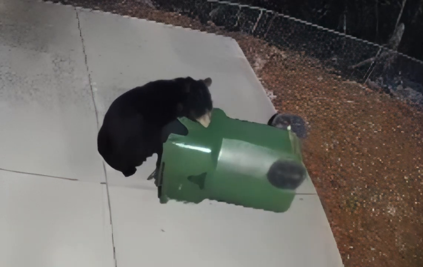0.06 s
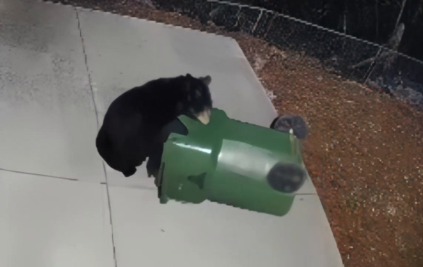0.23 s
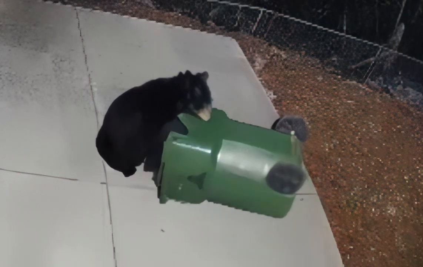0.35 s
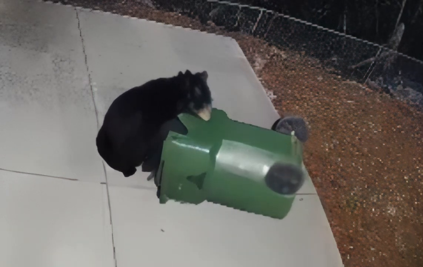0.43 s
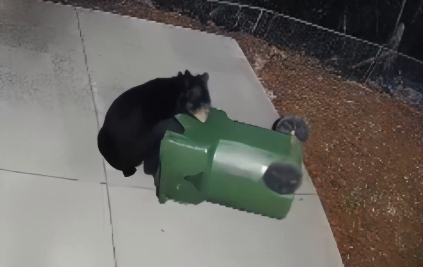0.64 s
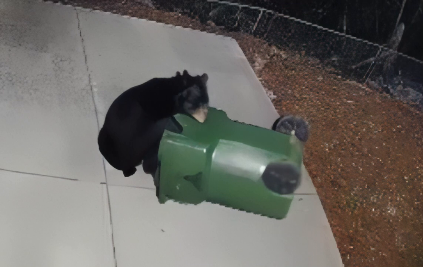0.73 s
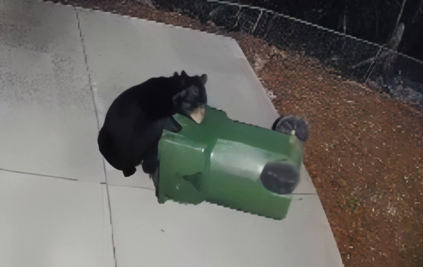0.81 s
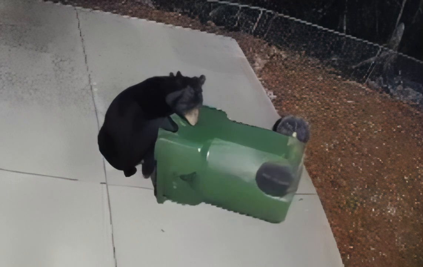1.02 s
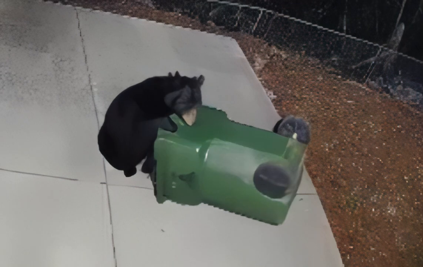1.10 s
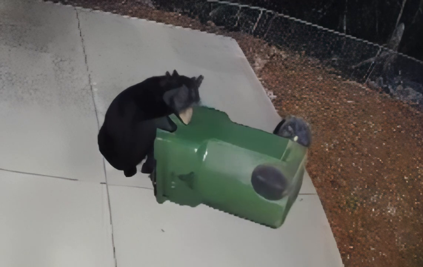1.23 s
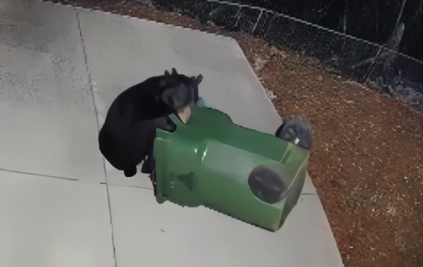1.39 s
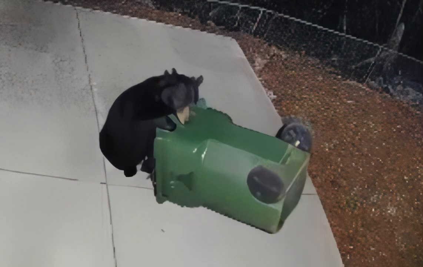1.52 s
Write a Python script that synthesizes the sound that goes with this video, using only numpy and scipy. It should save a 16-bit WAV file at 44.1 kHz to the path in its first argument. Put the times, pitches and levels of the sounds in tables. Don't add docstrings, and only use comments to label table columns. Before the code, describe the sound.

A plastic wheelie bin scrapes on concrete outdoors. After near-silent hush and faint creeping, claws scratch and knock it sharply from 0.2 to 0.35 seconds, with a hard gritty drag and ticks until about 0.55. Lighter knocks follow; a latch rings faintly at 0.84. Around 1.12-1.2 hollow, booming thuds tumble together, then small rattles fade to quiet, with a soft knock near 1.5. Muffled, squashed camera sound.

```python
import sys
import numpy as np
from scipy import signal
from scipy.fft import rfft, irfft
from scipy.io import wavfile
from scipy.ndimage import uniform_filter1d

SR = 44100
rng = np.random.default_rng(int(sys.argv[2]) if len(sys.argv) > 2 else 0)


def store_pcm(level_fs):
    pcm = np.round(np.clip(level_fs, -1, 1) * 32767).astype(np.int16)
    wavfile.write(sys.argv[1], SR, np.atleast_2d(pcm).T)


def linear_from_db(decibels):
    return 10 ** (np.asarray(decibels, float) / 20)


N = 68355

# pitch_hz, level_db (per Hz)
NIGHT_SPECTRUM = [(24, -30), (40, 5), (501, -12), (1190, -8.5), (6560, -20.5), (7000, -11), (9100, -45.5),
                  (15400, -120)]
# pitch_hz, width_hz, level_db
WALL_RESONANCES = [(600, 620, -8.5), (900, 193, -6), (1156, 170, -5.5), (1350, 250, -3.5),
                   (1730, 220, -7.5), (1870, 160, -17), (2514, 420, -7.5), (3000, 820, -5), (3696, 440, -9),
                   (4690, 500, -8.5), (5310, 1400, -12), (5920, 870, -5), (6500, 700, -28)]
# pitch_hz, level_db, t60_s
SHELL_MODES = [(42.8, -29, 0.16), (76, -8.5, 0.23), (100, -7, 0.17), (170.7, 0, 0.097), (220, -2, 0.1),
               (276.5, -2, 0.08), (346, 3, 0.035), (428, 3, 0.046), (644.5, -6, 0.28)]
# start_s, level_db, tilt_db (brightness per octave), shell_load_db
DRAG_MOVES = [(0.099, -52, 4.5, -19), (0.113, -42.5, 0.8, -35), (.19, -29, 7.5, -20),
              (0.342, -26, 0.9, -35), (.42, -20.5, 1, -17), (.465, -29.5, -0.2, -12), (.52, -25, -0.8, -24),
              (0.574, -40, -4, -2), (0.613, -44, -0.2, -17.5), (0.801, -45, 3, -7.5),
              (.87, -37.5, -1.5, -13), (0.914, -40.5, 1.5, 0), (1.0, -55.5, -1, -34),
              (1.054, -49, 3, -25.5), (1.124, -27, -1.2, -11.5), (1.308, -38.5, -0.3, -8.5),
              (1.43, -57, -1, -12), (1.55, -56.5, 0, -5)]
# start_s, length_s, level_db, centre_hz
CLAW_SCRATCHES = [(0.062, 0.021, -41.5, 3000), (0.198, 0.0079, -17.5, 3000), (0.208, 0.012, -12, 3800),
                  (0.22, 0.026, -10.5, 2200), (0.248, 0.015, -11.5, 2200), (0.267, 0.03, -10.5, 1700),
                  (0.305, 0.0057, -7, 3200), (0.324, 0.0071, -19.5, 2600), (0.436, 0.016, -22, 2800),
                  (0.525, 0.035, -21, 1925), (0.652, 0.013, -32.5, 1950), (0.666, 0.033, -23.5, 1760),
                  (0.746, 0.023, -29, 2100), (0.8, 0.01, -35.5, 3800), (0.83, 0.025, -31, 3950),
                  (0.872, 0.016, -30, 3770), (0.882, 0.02, -27, 900), (1.111, 0.017, -23.5, 1300),
                  (1.137, 0.034, -19.5, 1570), (1.199, 0.08, -31.5, 2400), (1.276, 0.011, -30, 2800),
                  (1.486, 0.039, -50, 1434)]
# start_s, peak_db, pitch_hz, ring_s
WALL_KNOCKS = [(.067, -44, 1312, 0.066), (.236, -13.5, 1313, .03), (.256, -14, 1750, .02),
               (.268, -11, 1277, 0.025), (.275, -16.5, 1270, 0.057), (.279, -16.5, 365.8, 0.029),
               (.287, -26, 329.5, 0.024), (.29, -22, 894, 0.035), (.305, -13.5, 1173, 0.017),
               (.323, -10.5, 1740, 0.022), (.341, -20, 1730, 0.03), (.531, -23.5, 1350, 0.05),
               (.534, -25, 900, 0.022), (.543, -25.5, 994, 0.013), (.67, -22.5, 1290, 0.0097),
               (.688, -27, 1360, 0.011), (.694, -27.5, 1340, 0.014), (.748, -35, 1393, 0.021),
               (.755, -32, 900, 0.02), (.756, -33, 1120, .02), (.755, -35, 1920, 0.032),
               (.883, -19, 1376, 0.013), (.886, -22.5, 1134, .02), (.89, -29.5, 600, 0.013),
               (1.114, -21.5, 901, 0.023), (1.116, -25, 1257, 0.031), (1.119, -27, 428, 0.074),
               (1.143, -18.5, 1485, 0.013), (1.144, -15, 442, 0.033), (1.162, -19, 414.5, 0.044),
               (1.172, -21.5, 504, 0.022), (1.192, -30, 1740, 0.047), (1.151, -20, 1363, 0.023),
               (1.164, -23.5, 1087, 0.085), (1.255, -29, 1730, 0.05), (1.28, -27, 1353, 0.046),
               (1.282, -32, 416, 0.03), (1.285, -34.5, 900, .03), (1.491, -43.5, 1520, 0.017)]
# start_s, peak_db, contact_s, best_mode_hz (mode struck best)
BIN_THUDS = [(0.077, -44.5, 0.0043, 100), (0.12, -38.5, 0.0048, 89.5), (0.217, -21.5, 0.00095, 70),
             (0.246, -32, 0.0075, 70), (0.284, -19, 0.0031, 232), (0.374, -31.5, 0.009, 76),
             (0.431, -34, 0.0044, 202.5), (0.464, -36.5, 0.014, 76), (0.489, -42, 0.0023, 190),
             (0.548, -49, 0.0098, 70), (0.669, -33, 0.0016, 257), (.69, -39.5, 0.0046, 89.7),
             (0.89, -29.5, 0.0032, 110.7), (1.065, -48.5, 0.0075, 59.7), (1.118, -16, 0.0045, 85),
             (1.13, -21, 0.0061, 80), (1.146, -9, 0.0036, 90), (1.16, -7.5, 0.0033, 140),
             (1.173, -13.5, 0.0028, 150), (1.188, -8.5, 0.003, 110), (1.2, -17, 0.0021, 140),
             (1.232, -26, 0.0035, 90), (1.258, -27.5, 0.0038, 170), (1.29, -27, 0.004, 100),
             (1.32, -36.5, 0.0045, 120), (1.386, -50, 0.0062, 76), (1.482, -37.5, 0.0049, 76),
             (1.498, -33.5, 0.0021, 110)]
# start_s, peak_db, pitch_hz, ring_s
CLAW_TICKS = [(.2, -6.5, 5310, 0.0061), (.2, -16.5, 2840, .01), (.211, -10, 5340, 0.016),
              (.209, -10, 5920, 0.012), (.21, -15, 4620, 0.03), (.221, -17, 3760, 0.035),
              (.249, -15, 4400, 0.12), (.253, -15, 2430, .02), (.272, -15.5, 2470, .03),
              (.283, -12, 5840, 0.038), (.294, -22, 3150, .02), (.305, -14, 6460, 0.027),
              (.322, -19, 2590, .015), (.306, -7, 3650, 0.029), (.4295, -7, 5930, 0.011),
              (.430, -18, 4720, .008), (.4305, -11.5, 3075, 0.029), (.47, -21.5, 5960, .01),
              (.509, -25, 5700, 0.021), (.528, -12.5, 5920, 0.014), (.529, -14.5, 2929, 0.043),
              (.66, -26, 3100, 0.02), (.659, -35, 5960, 0.014), (.669, -33, 6000, 0.013),
              (.67, -27, 2920, .03), (.691, -30.5, 2820, 0.029), (.749, -30.5, 2950, 0.014),
              (.747, -32, 5870, 0.024), (.755, -37, 6200, .02), (.776, -43, 5770, 0.014),
              (.806, -33.5, 4400, 0.028), (.8295, -22, 4580, 0.027), (.8295, -23, 3880, 0.015),
              (.83, -23.5, 2960, 0.027), (.839, -25.5, 3480, 0.047), (.843, -34, 3000, .04),
              (.888, -31, 6570, 0.022), (.878, -25, 5980, 0.013), (1.146, -27, 3150, 0.04),
              (1.166, -25, 2650, 0.053), (1.227, -30.5, 2350, .02), (1.235, -27, 2645, 0.037),
              (1.243, -30, 2530, 0.018), (1.253, -23.5, 2420, 0.033), (1.263, -25.5, 2580, .03),
              (1.279, -30.5, 5540, 0.023), (1.281, -28, 3400, 0.036), (1.29, -31.5, 2380, 0.033),
              (1.333, -35.5, 2430, .03)]
# start_s, end_s, centre_hz, width_hz
DROPPED_BANDS = [
    (1.09, 1.3, 4340, 120),
    (1.17, 1.27, 4300, 300),
    (1.215, 1.33, 1990, 170),
]

FLICKER_DB = 1.6


def level(x, db):
    return x * linear_from_db(db) / np.sqrt(np.mean(x ** 2))


def walk(rate_hz):
    hold = int(SR / rate_hz)
    steps = np.repeat(rng.standard_normal(N // hold + 1), hold)
    return 1.58 * uniform_filter1d(uniform_filter1d(steps, hold), hold)[:N]


def night():
    hz, db = np.array(NIGHT_SPECTRUM).T
    f = np.fft.rfftfreq(N, 1 / SR) + 1
    gain = linear_from_db(np.interp(np.log(f), np.log(hz), db))
    return level(irfft(rfft(rng.standard_normal(N)) * gain, N), -68.5)


def grit(per_s, spread_db):
    chance, sign, size = rng.random((3, N))
    clicks = (chance < per_s / SR) * np.sign(sign - 0.5)
    return level(clicks * linear_from_db(-spread_db * np.log(1 - size)), 0)


def wall(per_s, spread_db, colour_db):
    high_pass = signal.butter(2, 450, "high", fs=SR)
    hiss = level(signal.lfilter(*high_pass, rng.standard_normal(N)), 0)
    out = linear_from_db(-14) * hiss
    for hz, width_hz, db in WALL_RESONANCES:
        b, a = signal.iirpeak(hz, hz / width_hz / 1.53, SR)
        band = signal.lfilter(b, a, grit(per_s, spread_db))
        band = level(signal.lfilter(b, a, band), -10.5)
        out = out + band * linear_from_db(db + colour_db(hz) + FLICKER_DB * walk(60.04))
    return out


def ring(x, hz, t60_s):
    radius = np.exp(-np.log(1000) / (max(t60_s, 0.002) * SR))
    turn = 2 * np.pi * hz / SR
    return signal.lfilter([0, radius * np.sin(turn)], [1, -2 * radius * np.cos(turn), radius ** 2], x)


def shell(force):
    return sum(linear_from_db(db) * ring(force, hz, t60_s) for hz, db, t60_s in SHELL_MODES)


def drag(t):
    start_s, db, tilt_db, load_db = np.array(DRAG_MOVES).T
    creep_db = -64
    gain = linear_from_db(np.interp(t, start_s, db, left=creep_db) + 0.5 * walk(60))
    force = np.diff(uniform_filter1d(rng.standard_normal(N + 1), size=60))
    rumble = level(shell(force), 0) * linear_from_db(4.1 * walk(25))

    def colour_db(hz):
        return np.interp(t, start_s, tilt_db) * np.log2(hz / 2500)

    grains = wall(9000, 2.0, colour_db)
    return gain * (grains + rumble * linear_from_db(np.interp(t, start_s, load_db)))


def scratches(t):
    attack_s, t60_s = 0.004, 0.039
    gain, centre_hz = np.zeros(N), np.full(N, 2000.0)
    for start_s, length_s, db, hz in CLAW_SCRATCHES:
        rise = np.clip((t - start_s) / attack_s + 0.5, 0, 1) ** 2
        release_db = -60 * np.clip(t - start_s - length_s, 0, 1) / t60_s
        gain += linear_from_db(db + release_db) * rise
        centre_hz[t >= start_s - attack_s / 2] = hz

    def colour_db(hz):
        return -2.2 * np.log2(hz / centre_hz) ** 2

    return gain * linear_from_db(1.3 * walk(150)) * wall(6000, 2.5, colour_db)


def taps(table, burst_s, split):
    out = np.zeros(N)
    k = np.arange(600) / SR
    burst = k / burst_s * np.exp(-k / burst_s)
    for start_s, db, hz, ring_s in table:
        push = np.append(rng.standard_normal(600) * burst, np.zeros(5000))
        push = signal.lfilter(*signal.iirpeak(hz, 5.5, SR), push)
        tap = ring(push, hz, ring_s)
        tap = tap + 0.43 * ring(push, hz * (1 + split), ring_s * 0.5)
        tap = tap + 0.33 * ring(push, hz * (1 - split), ring_s * 0.56)
        i = int(start_s * SR)
        out[i:i + len(tap)] += (tap * linear_from_db(db) / np.abs(tap).max())[:N - i]
    return out


def knocks():
    return taps(WALL_KNOCKS, burst_s=0.0024, split=0.092)


def thuds(t):
    settle_s, settle_t60_s = 1.208, 0.06
    settle = linear_from_db(-60 * np.clip(t - settle_s, 0, 1) / settle_t60_s)
    out = np.zeros(N)
    for start_s, db, contact_s, best_hz in BIN_THUDS:
        push = np.sin(np.pi * np.clip((t - start_s) / contact_s, 0, 1)) ** 2
        boom = np.zeros(N)
        for hz, mode_db, t60_s in SHELL_MODES:
            struck_db = mode_db - 3.5 * np.log2(hz / best_hz) ** 2
            boom += linear_from_db(struck_db) * ring(push, hz, t60_s)
        if start_s < settle_s:
            boom = boom * settle
        out += boom * linear_from_db(db) / np.abs(boom).max()
    return out


def ticks():
    return taps(CLAW_TICKS, burst_s=0.00083, split=0.064)


def latch(t):
    start_s, hz, t60_s = 0.837, 3540, 0.2
    fade = (t > start_s) * linear_from_db(-60 * np.abs(t - start_s) / t60_s)
    return linear_from_db(-34) * np.sin(2 * np.pi * hz * t) * fade


def yard(near, t):
    tail = rng.standard_normal(SR // 2) * linear_from_db(-60 * t[:SR // 2] / 0.16)
    tail = tail * linear_from_db(-11.5) / np.sqrt(np.sum(tail ** 2))
    return signal.fftconvolve(near, tail)[:N]


def scene():
    t = np.arange(N) / SR
    near = drag(t) + scratches(t) + knocks() + ticks() + latch(t)
    mono = night() + near + yard(near, t) + thuds(t)
    return np.array([mono, mono])


def gate(t, start_s, end_s):
    return uniform_filter1d(1.0 * (t > start_s) * (t < end_s), size=900)


def top_cut(x, hz):
    return signal.sosfiltfilt(signal.ellip(10, 0.2, 40, hz, fs=SR, output="sos"), x)


def low_pass(x):
    return signal.sosfilt(signal.butter(12, 8000, fs=SR, output="sos"), x)


def record(dry):
    t = np.arange(N) / SR
    limit = 0.75
    x = signal.lfilter(*signal.butter(2, 45, "high", fs=SR), dry)
    x = limit * np.tanh(x / limit)
    mismatch = walk(400) * np.clip(walk(13) + 0.64, 0, 2)
    x = x + linear_from_db(-30.5) * x * mismatch * np.array([[1], [-1]])
    for start_s, end_s, hz, width_hz in DROPPED_BANDS:
        edges_hz = [hz - width_hz / 2, hz + width_hz / 2]
        band = signal.filtfilt(*signal.butter(2, edges_hz, "band", fs=SR), x)
        x = x - 0.72 * gate(t, start_s, end_s) * band
    dull = gate(t, 1.07, 1.265)
    mix = top_cut(x, 7076) * (1 - dull) + top_cut(x, 6550) * dull
    return low_pass(mix)


dry = scene()
out = record(dry)
store_pcm(out)
```